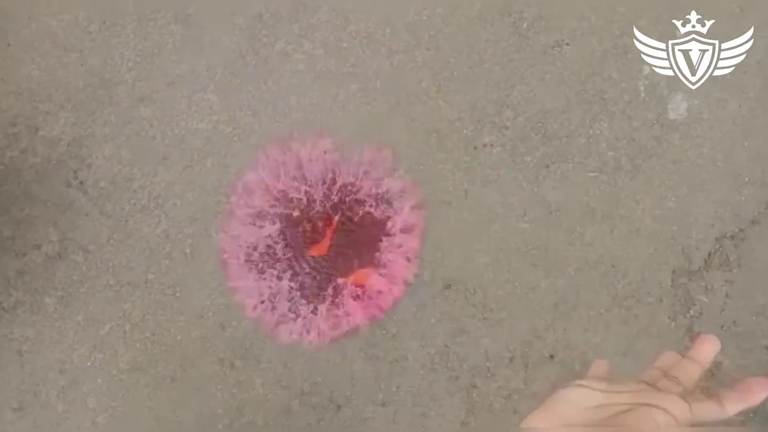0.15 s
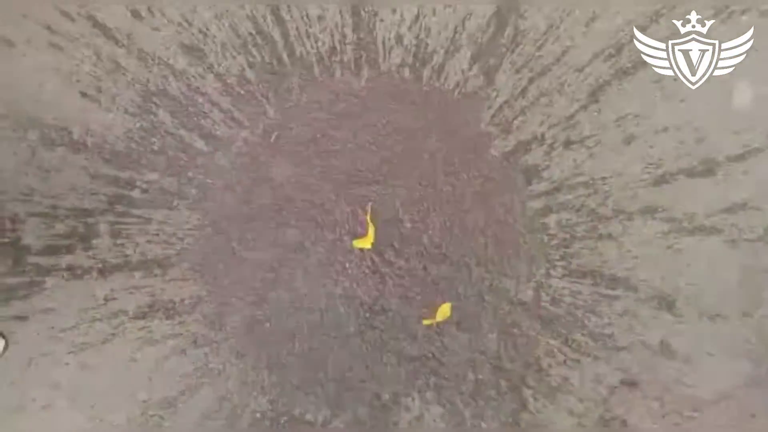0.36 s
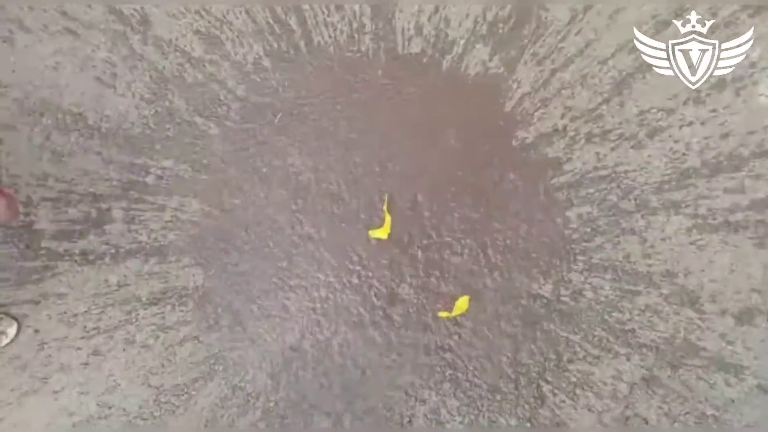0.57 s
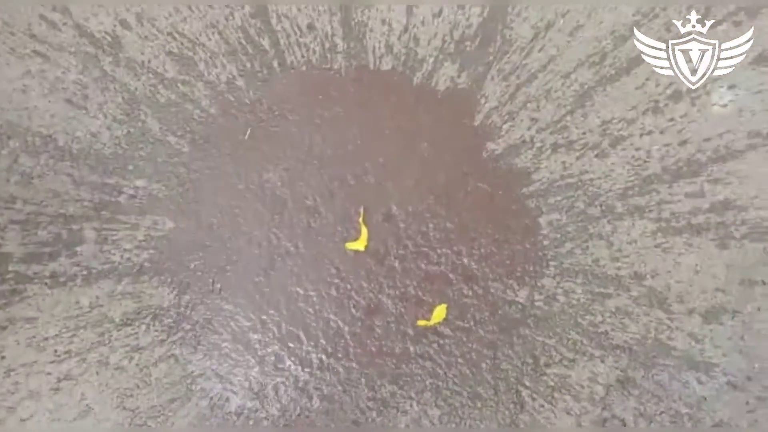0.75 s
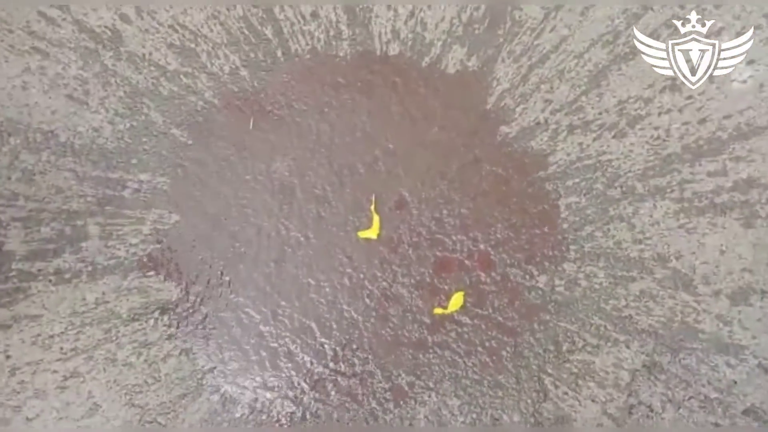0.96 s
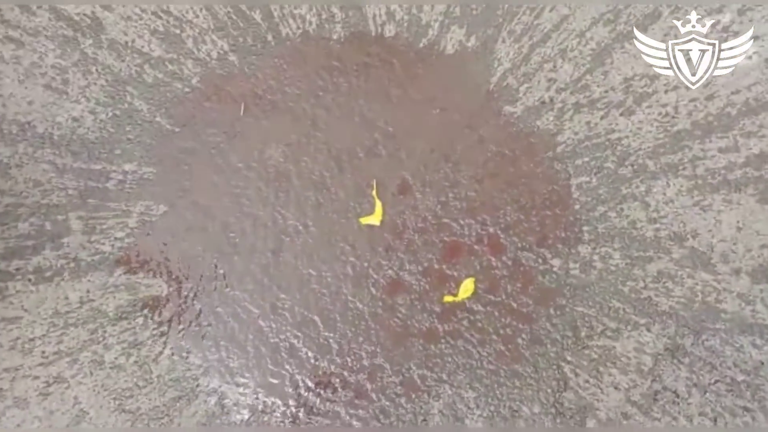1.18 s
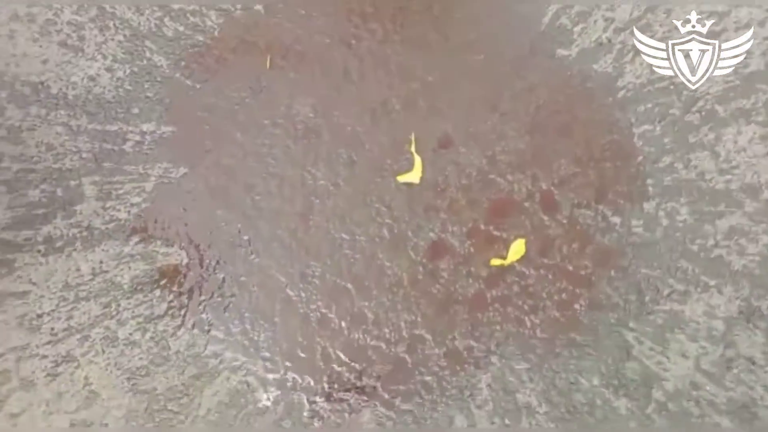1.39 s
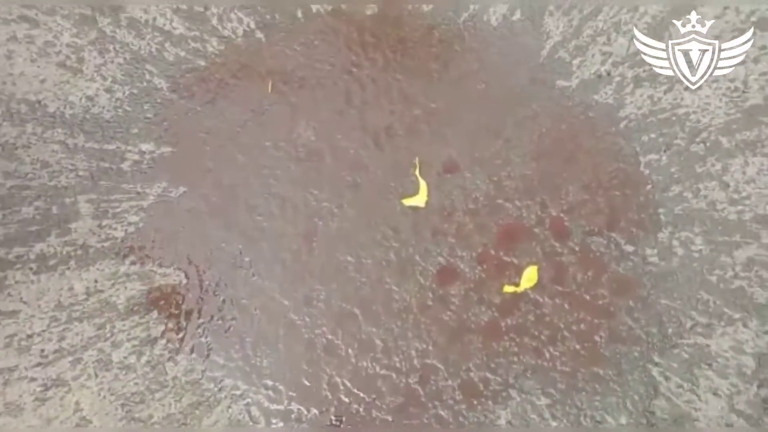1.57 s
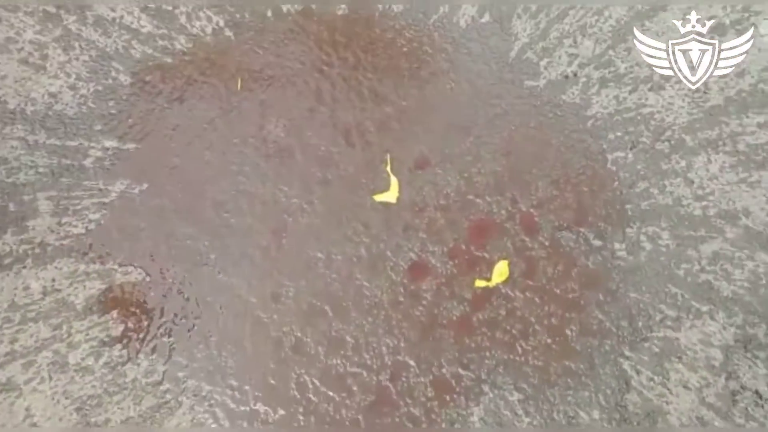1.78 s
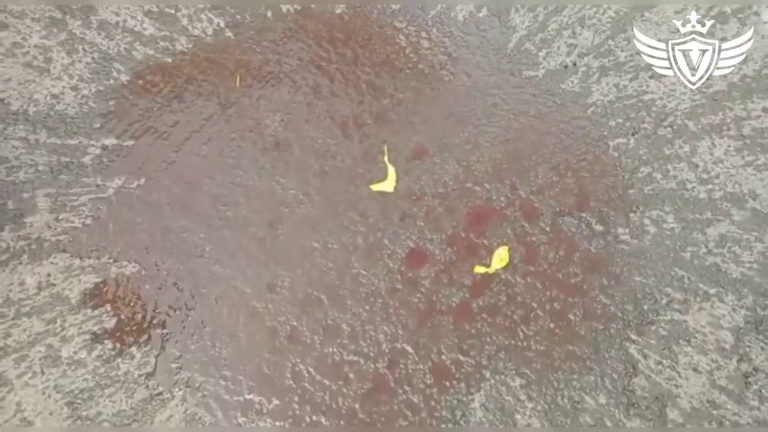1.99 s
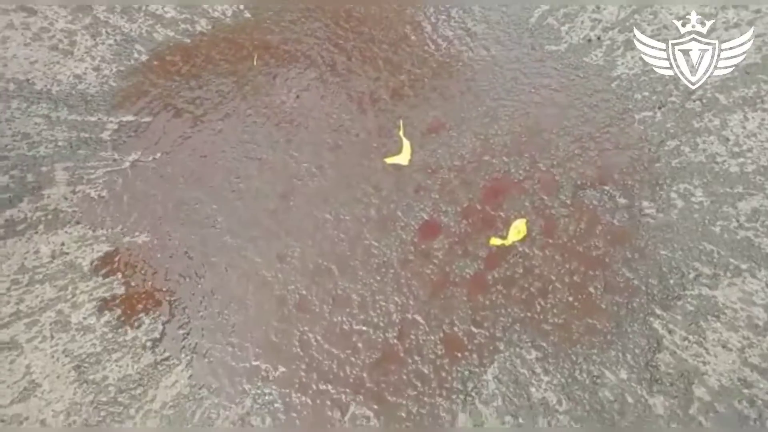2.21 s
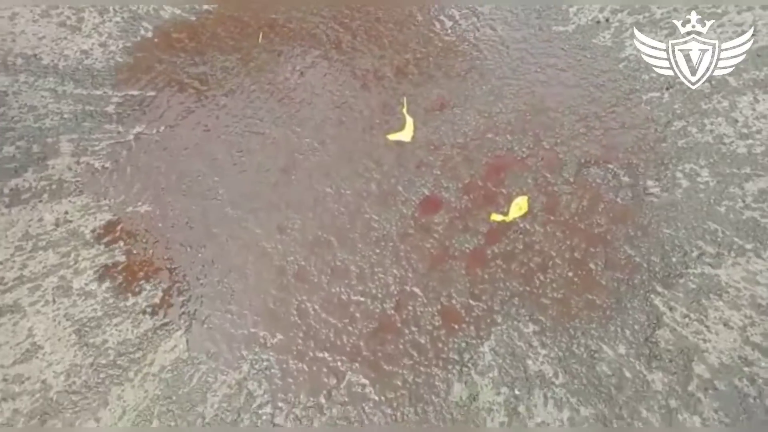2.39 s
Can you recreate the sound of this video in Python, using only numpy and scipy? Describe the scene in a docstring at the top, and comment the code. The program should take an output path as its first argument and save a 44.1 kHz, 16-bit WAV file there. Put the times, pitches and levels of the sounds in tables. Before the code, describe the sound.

A water balloon pops with a loud splat on outdoor concrete, and the water sprays outward. Stray drops land afterwards, while the hand-held microphone picks up soft bumps, light air rumble and very faint birdlike trills.

```python
"""A water balloon on concrete, outdoors. Hiss and rumble run throughout; a soft bump on the hand-held
microphone comes first. At 0.24 s the rubber cracks open, the water slaps the ground and fans out as
spray and a gurgling sheet. From 0.43 s stray drops land around the puddle, among more bumps and,
from 0.8 s, faint trills. Sharp sounds ring briefly near 3 and 9 kHz, the small microphone's colour."""
import sys
import numpy as np
from scipy import signal
from scipy.fft import rfft, irfft
from scipy.io import wavfile
from scipy.ndimage import map_coordinates

SR = 44100
rng = np.random.default_rng(int(sys.argv[2]) if len(sys.argv) > 2 else 0)


def inscribe(sig):
    """Save sig as 16-bit PCM at rate SR to the path in sys.argv[1].

    A 1-D sig is mono; a 2-D sig holds one channel per row.
    Samples are clipped to [-1, 1] before scaling.
    """
    pcm = np.round(np.clip(np.atleast_2d(sig).T, -1, 1) * 32767)
    wavfile.write(sys.argv[1], SR, pcm.astype(np.int16))


N = 108045

# skin cracks and first jets: t/s, peak/dB, tail t60/s
CRACKS = [(.2379, -9, 0.0045), (.2387, -4.5, 0.0065), (.2479, -4.5, 0.0046), (.2493, -2.5, 0.0072),
          (.2505, -7.5, 0.011), (.2532, -2.5, 0.0069), (.2549, -7, 0.007), (0.2552, -8.5, 0.013),
          (.2693, -19, 0.01), (.2825, -38, .012), (.2897, -18.5, 0.01), (.3208, -26, 0.0067),
          (.3580, -22, 0.0071), (.3640, -27, 0.025)]
# weight of the water on contact and on flattening: t/s, peak/dB
THUDS = [(.2381, -25), (0.2529, -17)]
# stray drops: t/s, peak/dB, splat t60/s, bubble f/Hz, bubble/splat ratio
DRIPS = [(.4288, -31, .012, 3130, 0.27), (0.4467, -29, 0.0075, 2960, 0.27),
         (0.4754, -24.5, .008, 2400, 0.18), (0.4895, -41, 0.018, 2980, 0.54), (.4945, -40, 0.006, 3050, .2),
         (0.517, -28, .016, 4520, 0.89), (0.529, -29, 0.013, 3180, 0.36), (0.5492, -26, 0.0087, 2400, 0.17),
         (0.5735, -37, 0.024, 2700, .2), (.588, -30, 0.021, 3250, .35), (0.6064, -39, .01, 3900, .2),
         (0.6173, -38, .012, 3000, 0.18), (0.66, -36, 0.015, 2960, 0.12), (0.6651, -33, 0.035, 1710, 0.49),
         (0.676, -39, .03, 3500, .1), (.7148, -35.5, .025, 2470, 0.17), (0.7286, -36, 0.02, 3000, .1),
         (.801, -44, 0.025, 2970, 0.09), (1.198, -40, 0.014, 3340, 0.092), (1.5393, -36, 0.036, 2670, 0.34),
         (1.705, -47, 0.027, 4150, .3), (2.047, -42.5, 0.056, 2780, 0.088), (2.345, -52, .05, 2880, .1)]
# tiny droplets: t/s, peak/dB
TICKS = [(.4585, -33), (.549, -31.5), (.666, -33), (0.6822, -36), (0.706, -35), (.7335, -35.5),
         (.8555, -34.5), (.8725, -45), (2.2703, -39)]
# microphone bumps: t/s, peak/dB, ring f/Hz, ring t60/s, push corner f/Hz, ring/push ratio
BUMPS = [(.001, -37.5, 85, 0.081, 89.5, 3.6), (0.5141, -42.5, 88, 0.051, 80, 2.5),
         (0.621, -48.5, 264, .05, 200, 1.2), (1.165, -43, 400, 0.014, 900, 0.32),
         (1.182, -45, 775, .03, 600, 0.91), (1.199, -41.5, 250, 0.048, 900, 0.38),
         (1.23, -57, 107, 0.08, 120, 3), (1.391, -45, 142, 0.043, 150, 1.2),
         (1.6684, -33, 139, 0.075, 800, 0.32), (1.677, -48, 412, 0.072, 300, 2.6),
         (1.812, -37, 136, 0.032, 600, 0.6)]
# distant trills: t/s, length/s, level/dB
TRILLS = [(0.804, .16, -68), (1.28, 0.14, -67.5), (1.859, 0.23, -67), (2.388, 0.13, -69)]

# envelopes: t/s, level/dB
SPRAY_ENVELOPE = [(.236, -93), (.24, -25.5), (.262, -21), (.29, -22), (.325, -26.5), (.364, -33),
                  (.395, -38), (.46, -43.5), (.525, -42), (.565, -48.5), (.64, -50.5), (.72, -56.5),
                  (.82, -64.5), (1.2, -75), (2.45, -88)]
RUMBLE_ENVELOPE = [(0, -53.5), (.22, -54.5), (.29, -69), (.45, -59.5), (.8, -54.5), (1.45, -57.5),
                   (1.6, -57.5), (2.45, -58)]
HISS_ENVELOPE = [(0, -55), (.8, -55.5), (1.2, -56), (1.4, -56.5), (1.6, -56), (1.85, -55), (2.15, -56),
                 (2.45, -55)]

# skin and water spectra: f/Hz, relative level/dB
CRACK_SPECTRUM = [(60, -33), (200, -21), (1000, -23), (1600, -24), (2300, -3), (2850, 2.5), (3700, -3),
                  (4600, -14.5), (6500, -28), (8200, -24.5), (9400, -13), (11000, -27), (15000, -28)]
THUD_SPECTRUM = [(50, -23), (180, -15.5), (380, -0.5), (650, -5.5), (1050, 2), (1450, -13.5), (2200, -3.5),
                 (5000, -37)]
SLAP_SPECTRUM = [(60, -43), (200, -34), (380, -12), (620, -10.5), (1000, 1), (1450, -7), (2000, 5.5),
                 (2900, 5.5), (4500, -7), (6500, -35), (9400, -11), (11500, -35), (15000, -31)]
SPRAY_SPECTRUM = [(100, -45), (600, -31), (1500, -33), (2000, -11.5), (2500, 0.5), (2950, 2), (3700, -3),
                  (4600, -16), (6300, -41), (9300, -41), (12000, -40), (15500, -60)]
MIST_SPECTRUM = [(1500, -19), (4500, -3), (6500, -11), (8000, -9), (9300, 1.5), (10500, -9.5), (12500, -14),
                 (15500, -19)]
SHEET_SPECTRUM = [(200, -36), (680, -18), (800, 3), (1120, 0.5), (1400, -2), (1900, -9), (3000, -34)]
SPLAT_SPECTRUM = [(200, -23), (1200, -21), (2000, -15), (2700, 4.5), (3800, 1.5), (5000, -12),
                  (6500, -22.5), (9300, -12.5), (12000, -31), (15500, -28)]
TICK_SPECTRUM = [(1000, -28), (4000, -8), (6500, -13), (8800, 1.5), (10500, -2), (12500, -17),
                 (15500, -14.5)]

# background spectra: f/Hz, relative level/dB
RUMBLE_SPECTRUM = [(20, -36), (45, -12.5), (80, -1), (140, -2), (250, -9.5), (550, -10), (900, -15.5),
                   (1500, -23.5), (4000, -34.5)]
HISS_SPECTRUM = [(500, -21), (1400, -10.5), (2200, -0.5), (2800, 1.5), (3800, 0), (4600, -11),
                 (5250, -13.5), (6000, -21), (8300, -22), (9700, -27), (11500, -25), (15500, -35)]
EARLY_FIZZ_SPECTRUM = [(5000, -26), (8000, -14), (9200, -5.5), (10500, -18), (12500, -40)]
LATE_FIZZ_SPECTRUM = [(5000, -25), (7200, -5), (8200, 2), (9500, -9), (12500, -21)]

BURST_S, SLAP_S = CRACKS[0][0], .2535
DROPS_PER_S = 7000


def burst():
    """The skin cracks open; the mass of water thuds and slaps on the concrete."""
    out = np.zeros(N)
    for start_s, peak_db, t60_s in CRACKS:
        add(out, start_s, amp(peak_db) * snap(CRACK_SPECTRUM, t60_s, tail_gain=.14))
    for start_s, peak_db in THUDS:
        add(out, start_s, amp(peak_db) * snap(THUD_SPECTRUM, t60_s=.019, tail_gain=.038))
    t = clock() - SLAP_S
    swell = fade(-t, t60_s=.039) * fade(t, t60_s=.082)
    slap = colour(patter(DROPS_PER_S, spread_db=3.5), SLAP_SPECTRUM)
    return out + amp(-18) * swell * slap


def spray(thinning_s=.25, mist_db_per_s=42):
    """Clumps of drops and fine mist land ever more thinly."""
    age_s = np.maximum(clock() - BURST_S, 0)
    density = np.exp(-age_s / thinning_s)
    clumps = unit(amp(1.5 * wobble(110)))
    impacts = clumps * patter(DROPS_PER_S * density + 400, spread_db=4)
    drops = envelope(SPRAY_ENVELOPE) * colour(impacts, SPRAY_SPECTRUM)
    mist = colour(patter(9000 * density + 1500, spread_db=3), MIST_SPECTRUM)
    mist_gain = (age_s > 0) * amp(-38 - mist_db_per_s * age_s)
    return drops + mist_gain * mist


def sheet(decay_db_per_s=152, end_s=.378):
    """After the slap a sheet of water gurgles outward."""
    t = clock()
    gain = amp(-33.5 - decay_db_per_s * (t - BURST_S))
    gate = (t > SLAP_S) * fade(t - end_s, t60_s=.1)
    return gain * gate * colour(patter(1460, spread_db=4), SHEET_SPECTRUM)


def drips():
    """Stray drops splat and ring a tiny bubble; the smallest only tick."""
    out, t = np.zeros(N), clock()[:4096]
    for start_s, peak_db, t60_s, bubble_hz, bubble_ratio in DRIPS:
        bubble = np.sin(2 * np.pi * bubble_hz * t) * fade(t, t60_s=.023)
        drop = snap(SPLAT_SPECTRUM, t60_s, tail_gain=.24) + bubble_ratio * bubble
        add(out, start_s, amp(peak_db) * drop / np.abs(drop).max())
    for start_s, peak_db in TICKS:
        add(out, start_s, amp(peak_db) * snap(TICK_SPECTRUM, t60_s=.0072, tail_gain=.3))
    return out


def walls(x, delay_s=.011, level_db=-14):
    """Short, faint reflections from nearby walls."""
    t = clock()[:SR // 2]
    tail = rng.standard_normal(len(t)) * fade(t, t60_s=.26) * (t > delay_s)
    return amp(level_db) * signal.fftconvolve(x, tail / np.linalg.norm(tail))[:N]


def bumps(low_hz=55, high_hz=980):
    """Bumps on the microphone: a dull push, then a short low ring."""
    out, t = np.zeros(N), clock()[:8192]
    casing = np.vstack([signal.butter(2, low_hz, "high", fs=SR, output="sos"),
                        signal.butter(4, high_hz, fs=SR, output="sos")])
    for start_s, peak_db, ring_hz, t60_s, corner_hz, ring_ratio in BUMPS:
        rise = 2 * np.pi * corner_hz * t
        push = np.e * rise * np.exp(-rise)
        ring = np.sin(2 * np.pi * ring_hz * t) * fade(t, t60_s) * (1 - np.exp(-rise))
        bump = signal.sosfilt(casing, push - ring_ratio * ring)
        add(out, start_s, -amp(peak_db) * bump / np.abs(bump).max())
    return out


def trills(centre_hz=5246, sweep_hz=303, rasp_hz=130, chirps_per_s=37):
    """Birdlike runs of raspy falling chirps, blurred by distance."""
    out = np.zeros(N)
    for start_s, length_s, level_db in TRILLS:
        t = clock()[:int(length_s * SR)]
        cycle = t * chirps_per_s % 1
        pitch_hz = centre_hz + sweep_hz * (.5 - cycle) + rasp_hz * wobble(598)[:len(t)]
        tone = np.sin(2 * np.pi * np.cumsum(pitch_hz) / SR)
        swell = np.sin(np.pi * cycle) * np.sqrt(np.abs(np.sin(np.pi * t / length_s)))
        add(out, start_s, amp(level_db) * unit(swell * tone))
    t = clock()[:SR // 10]
    blur = rng.standard_normal(len(t)) * fade(t, t60_s=.021)
    return signal.fftconvolve(out, blur / np.linalg.norm(blur))[:N]


def outdoors():
    """Rumble of moving air under a fine-grained hiss."""
    rumble_gain = envelope(RUMBLE_ENVELOPE) * amp(.45 * wobble(13.85))
    rumble = colour(rng.standard_normal(N), RUMBLE_SPECTRUM)
    hiss_gain = envelope(HISS_ENVELOPE) * amp(.33 * wobble(18))
    hiss = colour(patter(6000, spread_db=2), HISS_SPECTRUM)
    return rumble_gain * rumble + hiss_gain * hiss


def fizz(sink_s=(1.1, 2.14), decay_db_per_s=3.5):
    """Thin top of the hiss, fading and sinking from 9.2 to 8.2 kHz."""
    t = clock()
    blend_rad = np.interp(t, sink_s, [0, np.pi / 2])
    early = np.cos(blend_rad) * colour(rng.standard_normal(N), EARLY_FIZZ_SPECTRUM)
    late = np.sin(blend_rad) * colour(rng.standard_normal(N), LATE_FIZZ_SPECTRUM)
    return amp(-63.5 - decay_db_per_s * t) * (early + late)


def snap(spectrum, t60_s, tail_gain, size=4096):
    """Coloured spike with a noise tail, peak 1."""
    x = tail_gain * rng.standard_normal(size) * fade(np.arange(size) / SR, t60_s)
    x[0] = -1
    x = colour(x, spectrum)
    return x / np.abs(x).max()


def patter(rate_per_s, spread_db):
    """Random impacts of scattered size, mean power 1 at any rate."""
    chance = np.clip(rate_per_s / SR, 1e-4, 1)
    sizes = amp(spread_db * np.clip(rng.standard_normal(N), -2, 2))
    impacts = unit(sizes * rng.choice([-1, 1], N))
    return (rng.random(N) < chance) * impacts / np.sqrt(chance)


def colour(x, spectrum, size=4096):
    """Minimum-phase filter of energy 1 with the given spectrum."""
    f_hz, level_db = np.transpose(spectrum)
    bins_hz = np.fft.rfftfreq(size, 1 / SR)
    gain = amp(np.interp(np.log(bins_hz + 1), np.log(f_hz), level_db))
    cepstrum = irfft(np.log(gain))
    cepstrum[1:size // 2] *= 2
    cepstrum[size // 2 + 1:] = 0
    response = irfft(np.exp(rfft(cepstrum)))
    return signal.fftconvolve(x, response / np.linalg.norm(response))[:len(x)]


def wobble(knots_per_s):
    """Random piecewise-linear curve."""
    return map_coordinates(rng.standard_normal(N), [clock() * knots_per_s], order=1)


def envelope(rows):
    """Gain per sample from t/s, level/dB rows."""
    return amp(np.interp(clock(), *np.transpose(rows)))


def fade(t, t60_s):
    """Exponential decay from t = 0; 1 before."""
    return np.exp(-np.log(1000) * np.maximum(t, 0) / t60_s)


def add(out, start_s, x):
    """Mix x into out."""
    i = max(round(start_s * SR), 0)
    out[i:i + len(x)] += x[:N - i]


def amp(db):
    """dB to gain."""
    return 10 ** (np.asarray(db) / 20)


def unit(x):
    """Scale to rms 1."""
    return x / np.sqrt(np.mean(x ** 2) + 1e-20)


def clock():
    """Sample times in s."""
    return np.arange(N) / SR


def scene():
    """Water, reflections and background, mono."""
    water = burst() + spray() + sheet() + drips()
    return (water + walls(water) + bumps() + trills() + outdoors() + fizz())[None]


def record(dry):
    """Recorder band limit: steep low-pass at 15.5 kHz."""
    return signal.sosfilt(signal.ellip(12, .1, 90, 15500, fs=SR, output="sos"), dry)


dry = scene()
out = record(dry)
inscribe(out)
```